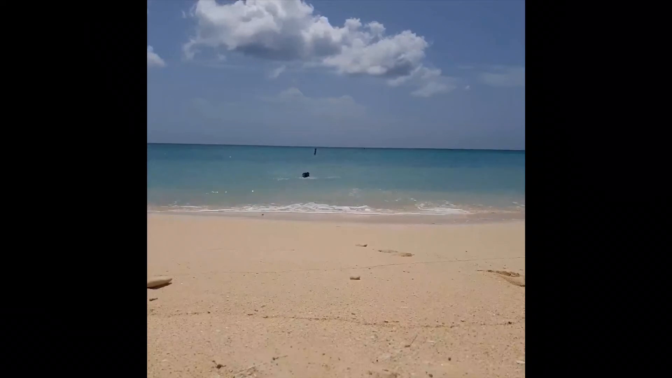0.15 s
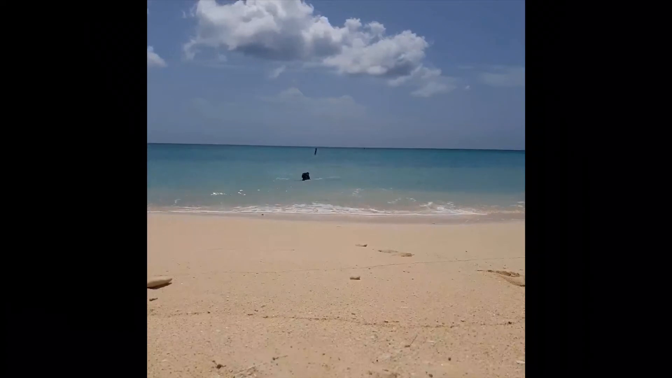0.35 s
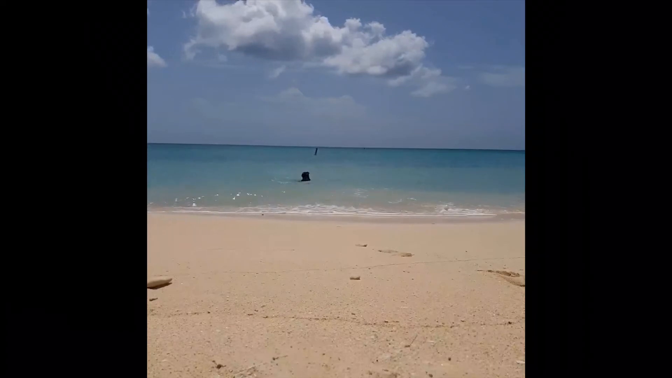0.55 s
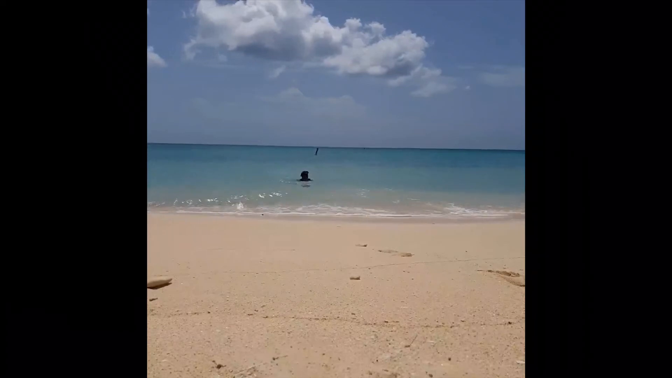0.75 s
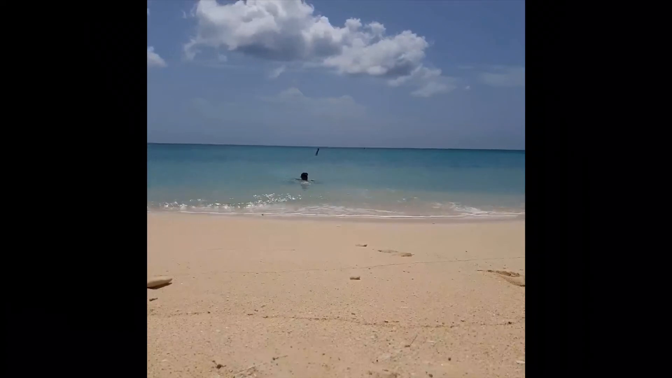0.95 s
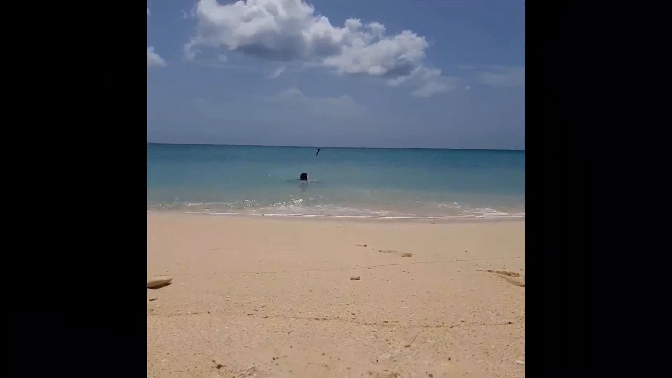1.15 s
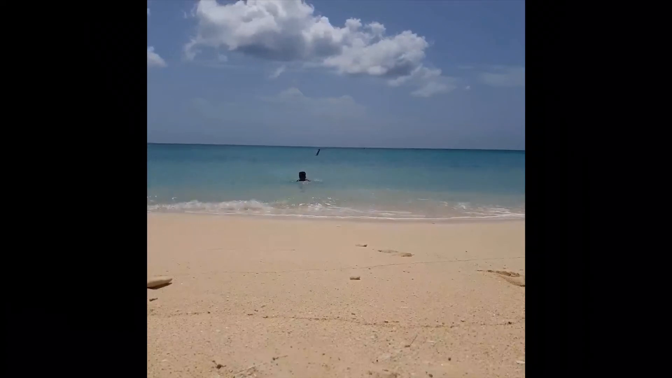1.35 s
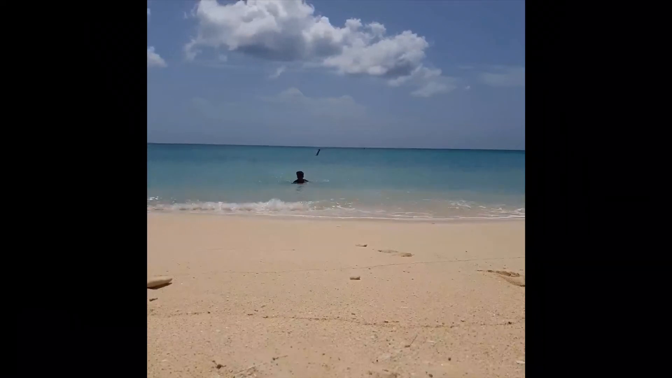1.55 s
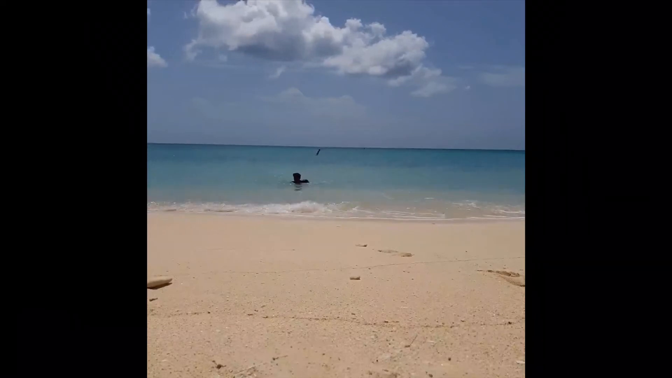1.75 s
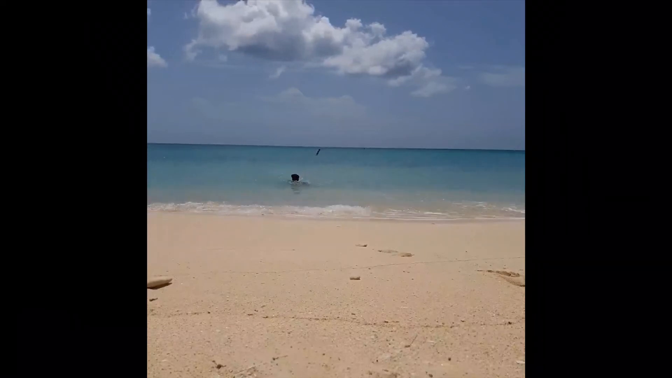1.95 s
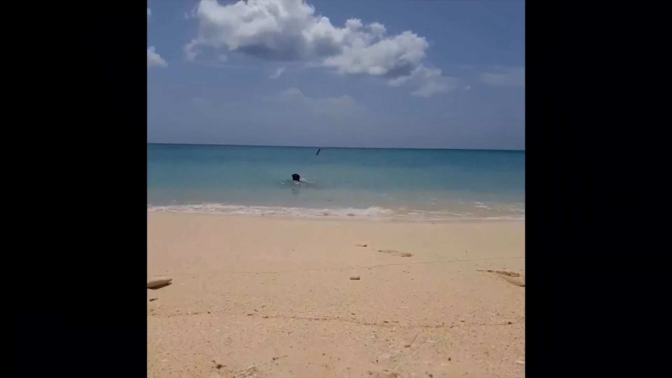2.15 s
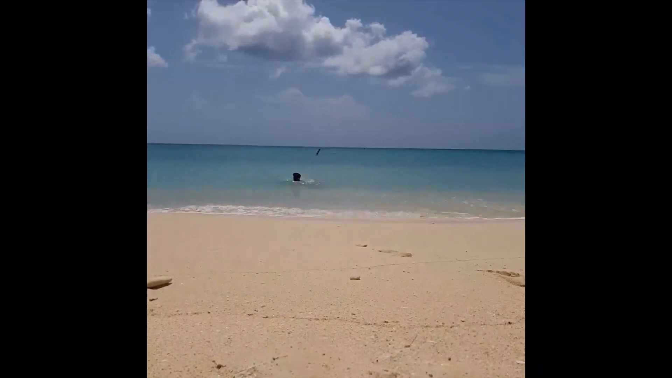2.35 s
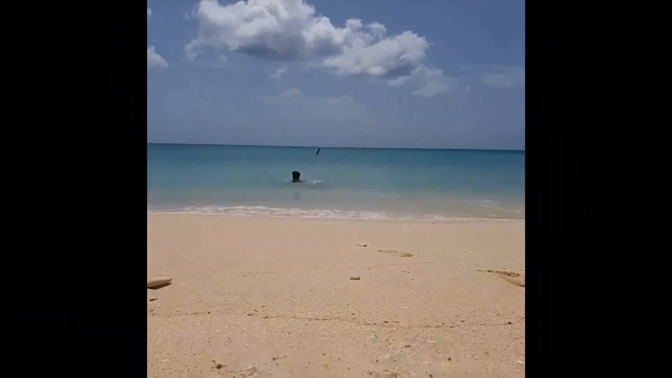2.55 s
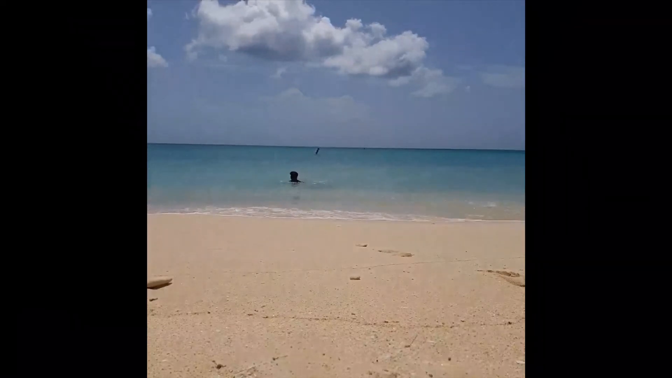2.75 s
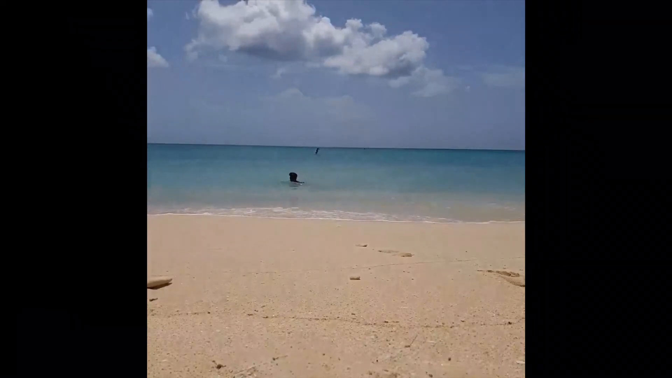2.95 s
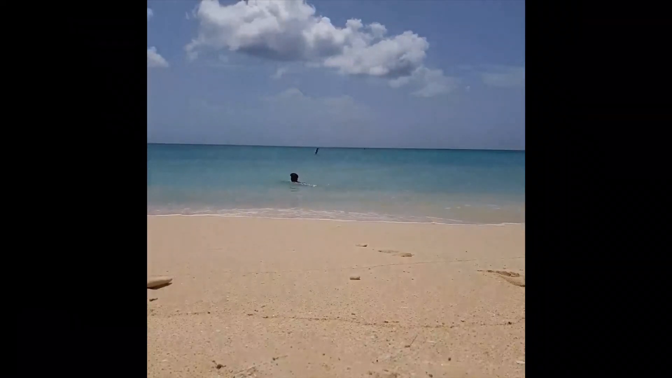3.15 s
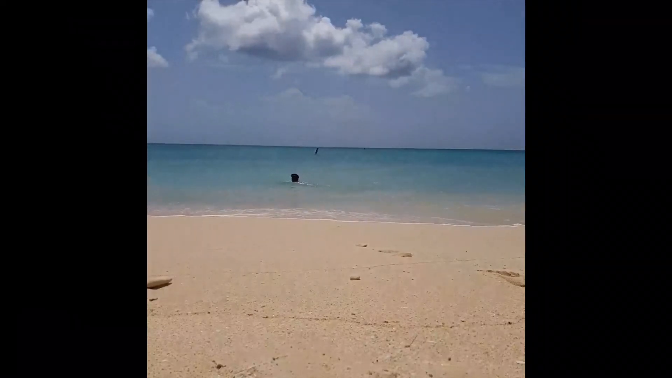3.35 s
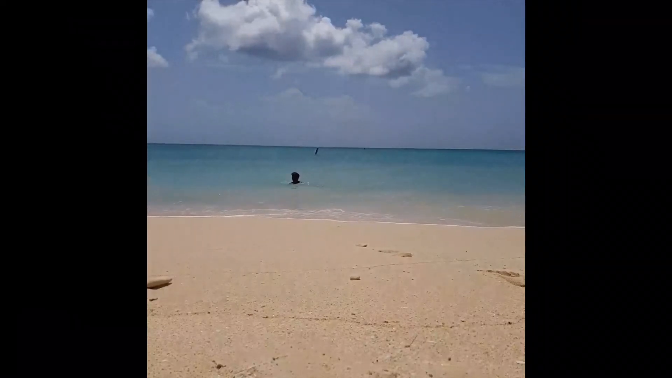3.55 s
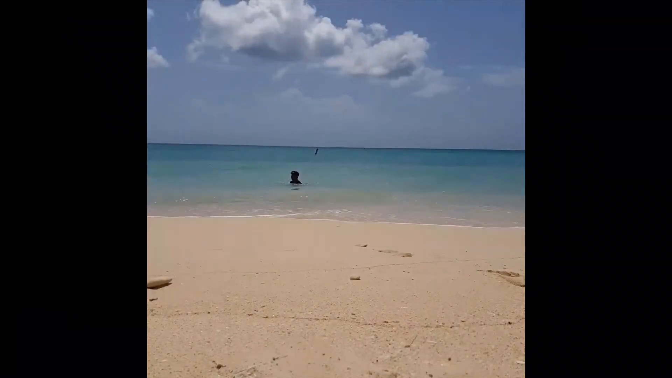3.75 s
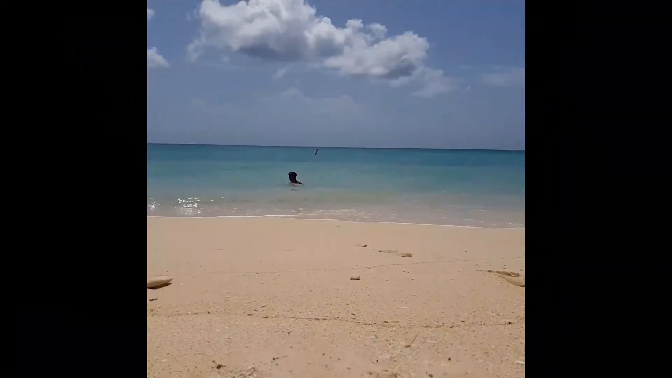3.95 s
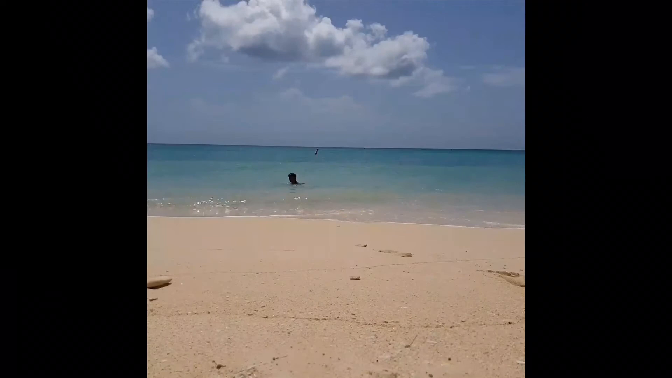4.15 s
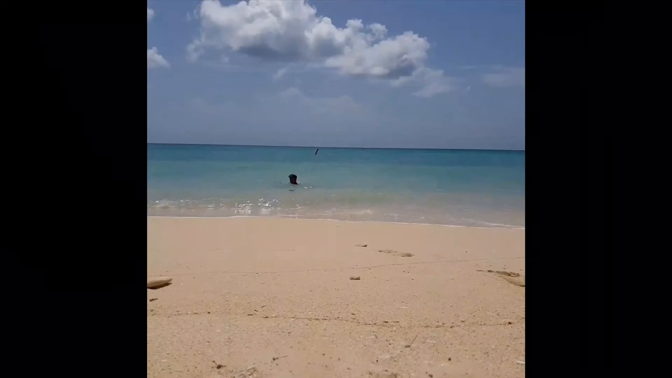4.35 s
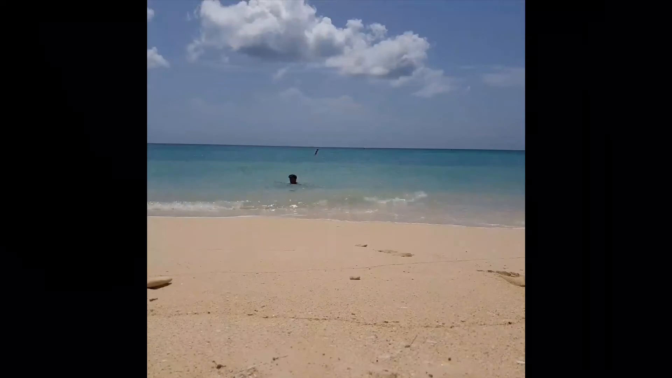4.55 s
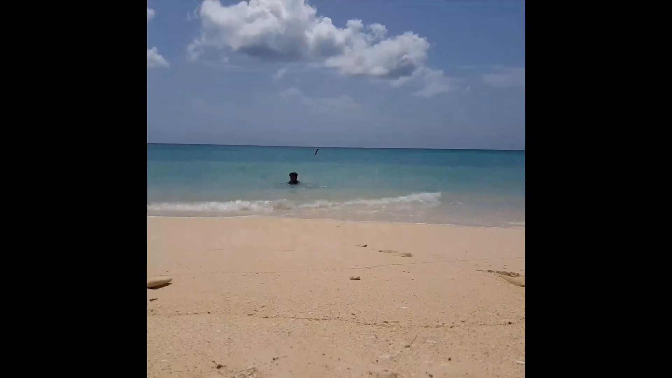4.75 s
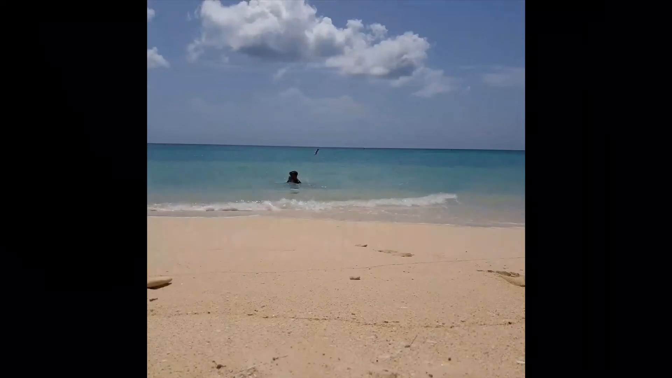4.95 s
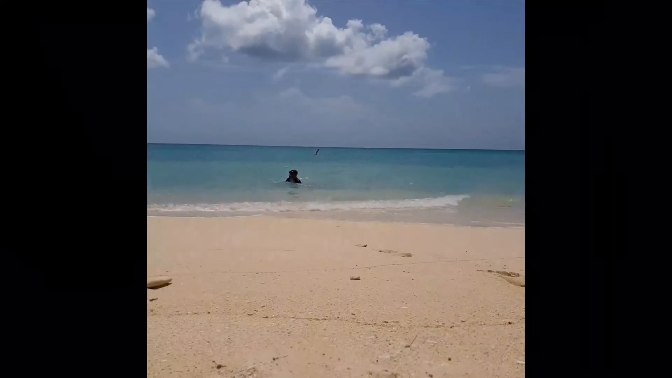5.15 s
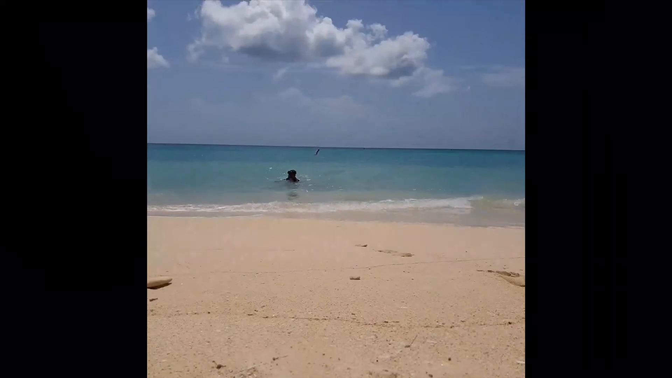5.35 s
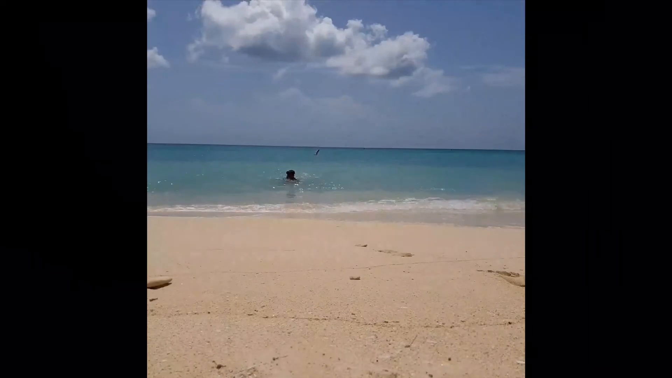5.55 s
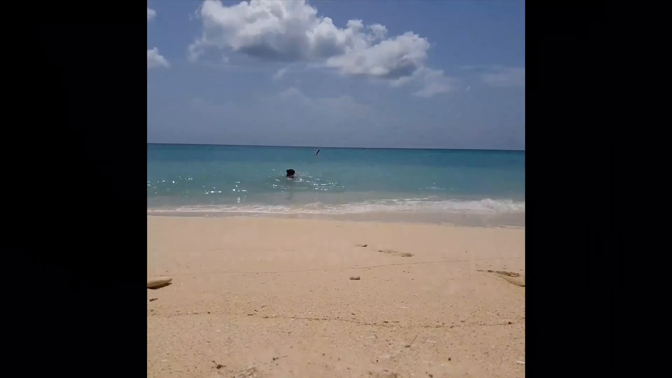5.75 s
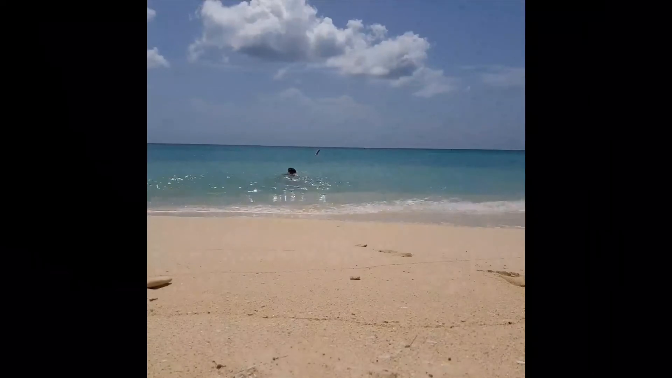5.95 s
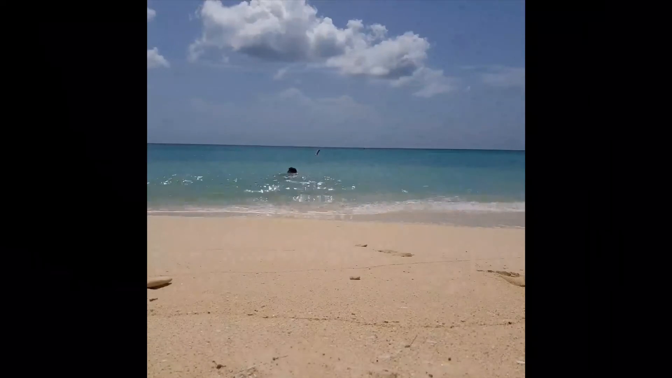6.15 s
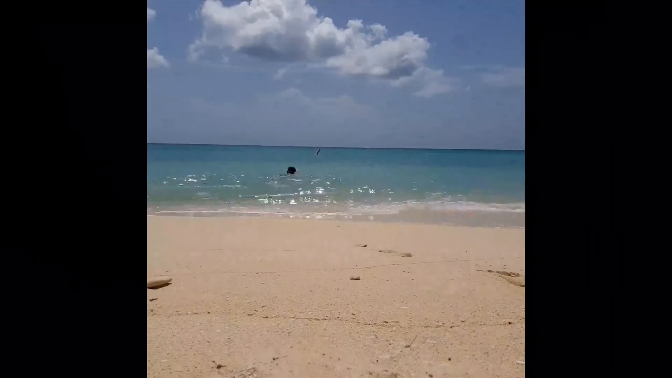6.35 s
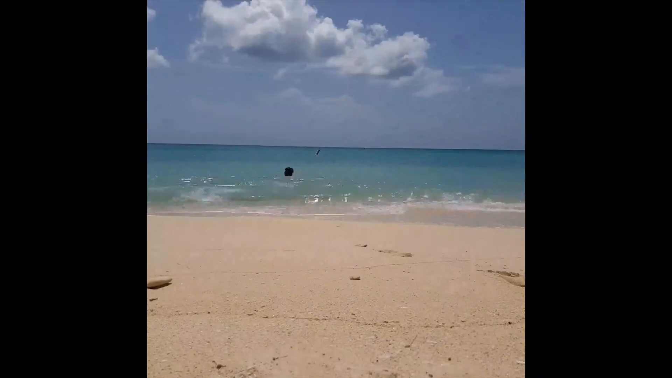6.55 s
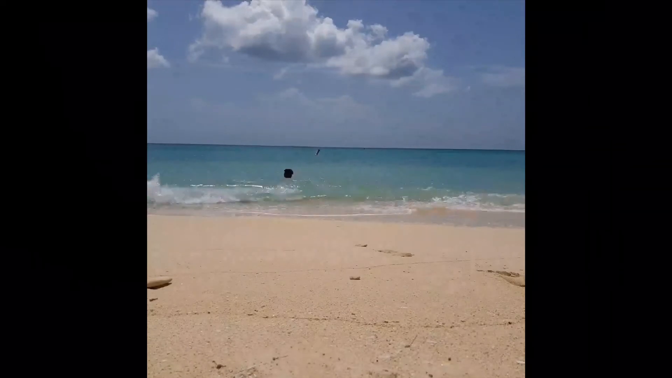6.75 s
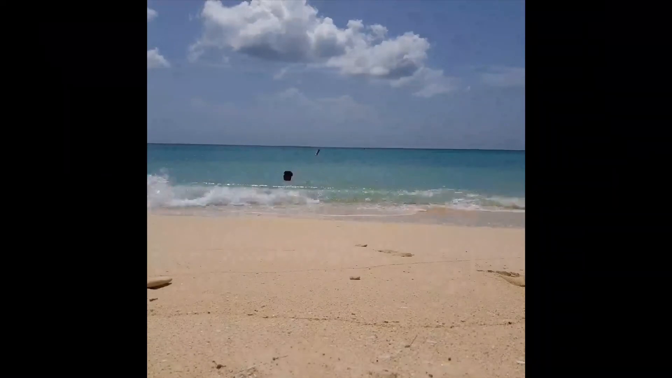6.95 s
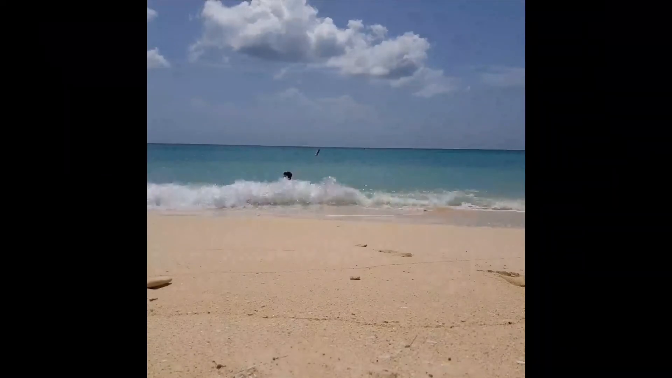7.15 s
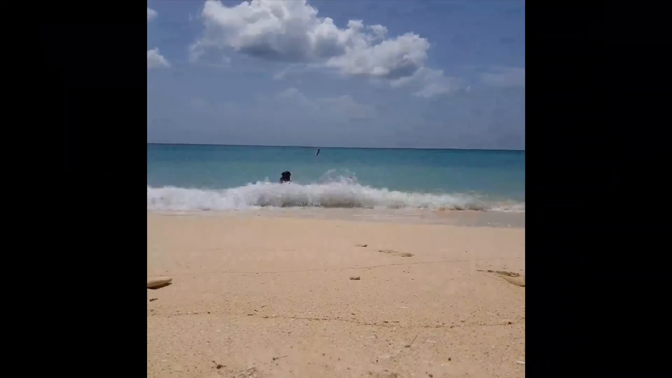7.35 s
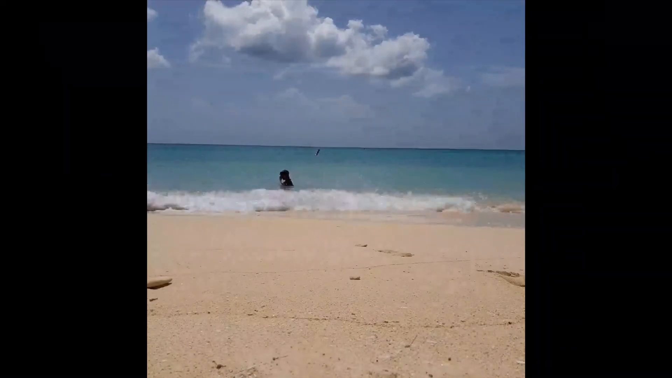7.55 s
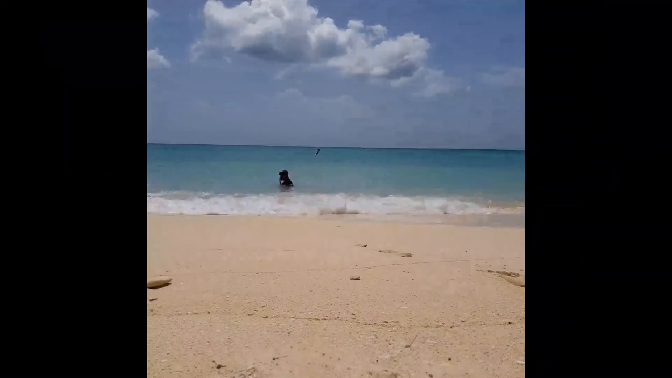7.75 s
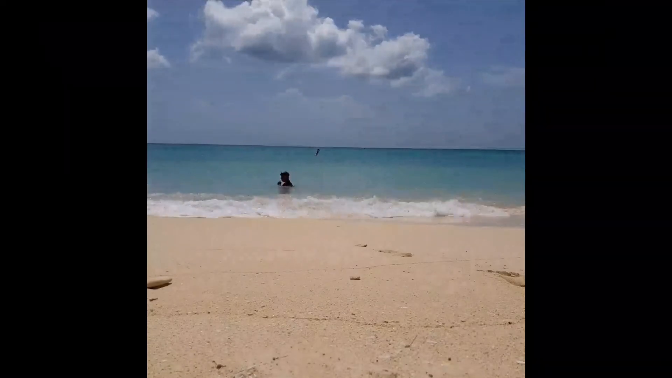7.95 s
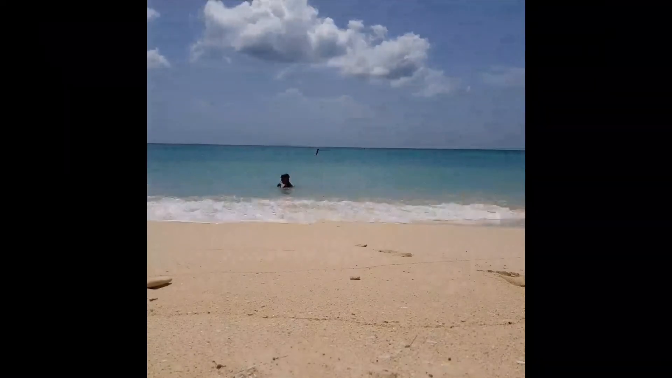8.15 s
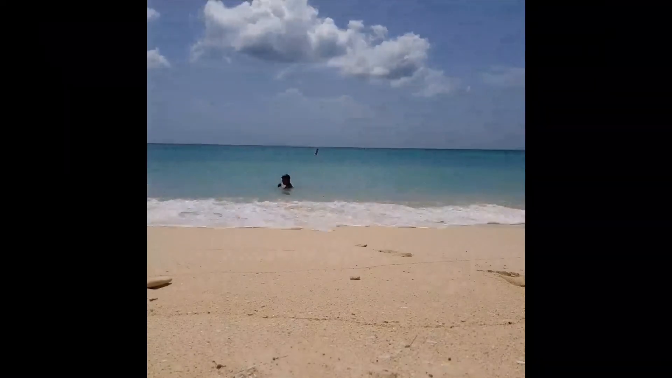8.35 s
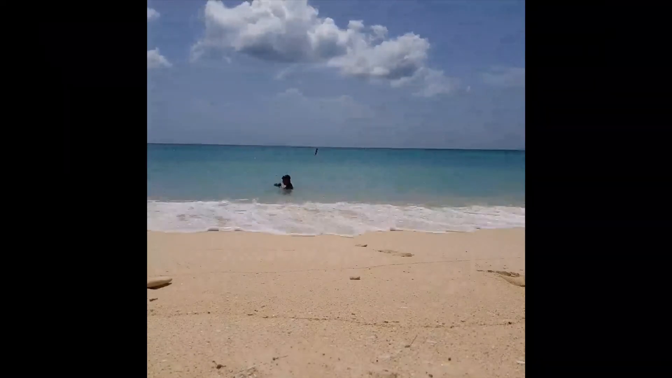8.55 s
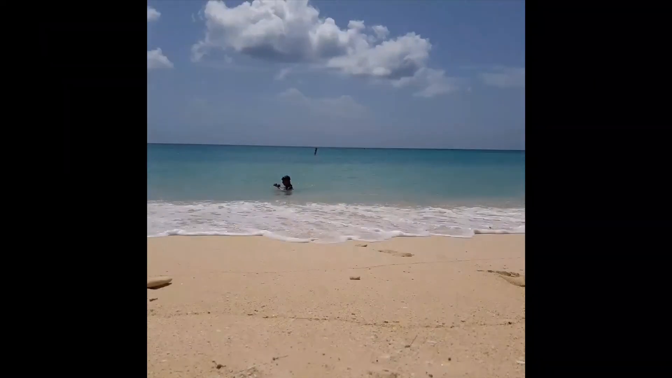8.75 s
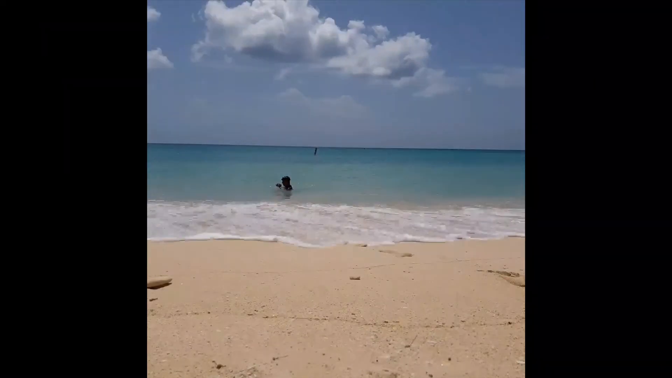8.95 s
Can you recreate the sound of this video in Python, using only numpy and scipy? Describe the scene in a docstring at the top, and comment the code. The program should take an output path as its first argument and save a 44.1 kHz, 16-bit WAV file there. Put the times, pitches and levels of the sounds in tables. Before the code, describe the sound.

Gentle surf splashes and foams over sand, swelling and ebbing, while wind puffs against the microphone and engines drone far away.

```python
"""Small waves spill on a sandy beach: noise and clouds of ringing bubbles make churn, splash, spray and foam.
The largest wave comes late, with a boom of buried air, and its foam fizzes on. Slaps and drops are short
bursts of noise; single large bubbles plop. Far engines, built from sine waves, drone over a noise rumble,
and one speeds up and fades. Puffs of wind thump on the left microphone port; the right one hears late and dull."""
import sys
import numpy as np
from scipy import signal
from scipy.fft import rfft, irfft, next_fast_len
from scipy.io import wavfile
from scipy.ndimage import uniform_filter1d, map_coordinates

SR = 44100
rng = np.random.default_rng(int(sys.argv[2]) if len(sys.argv) > 2 else 0)


def digitize_waveform(pressure):
    """Quantize a signal to 16-bit integers and store it at the path in sys.argv[1].

    Rows of a 2-D input are taken as channels; values are limited to [-1, 1].
    """
    field = np.atleast_2d(pressure).T
    bounded = np.clip(field, -1, 1)
    quanta = np.round(bounded * 32767).astype(np.int16)
    wavfile.write(sys.argv[1], SR, quanta)


N = 396900  # 9 seconds

# In the tables, rise, hold-style swell times (rise and fall in seconds per 10 dB) below 0.01 count as 0.01; #
# the rises of short bursts are used as written. Colours are relative: their sound is levelled afterwards.

# The far rumble of traffic and sea. Each row: frequency in Hz, colour in dB per Hz.
RUMBLE_COLOUR = [(20, -35), (40, -13.5), (65, -1), (90, -1), (130, -6.5), (200, -3), (300, -9), (600, -49),
                 (2000, -57)]
# An engine under load. Each row: frequency in Hz, colour in dB per Hz.
ROAR_COLOUR = [(60, -35), (150, 2.5), (220, -13), (340, -7.5), (550, -22.5), (1500, -36.5)]
# Engines roaring under load. Each row: start of the hold in seconds, level in dB, rise in seconds per 10 dB,
# hold in seconds, fall in seconds per 10 dB.
ENGINE_ROARS = [(2.65, -53, 9.5, 0.2, 0), (4.25, -47.5, 1.2, 0.26, 3), (8.55, -47, 0.2, 0.49, 4)]
# Engines drifting in and out of earshot. Each row: start of the hold in seconds, level in dB,
# rise in seconds per 10 dB, hold in seconds, fall in seconds per 10 dB, average firing rate in Hz.
ENGINE_DRONES = [(0, -49, .1, 0.26, -0.1, 95.1), (.2, -52.5, 1.5, 1.25, -0.5, 198.7),
                 (3.95, -54, 1.2, 3.3, 3, 73), (4.8, -54.5, 0.5, .95, 0.7, 93.5),
                 (6.3, -46, 0.1, .35, 3.5, 98.2)]
# One engine pulls away. Each row: time in seconds, average firing rate in Hz, level in dB.
ENGINE_PULLS_AWAY = [(7.8, 60, -72), (8.17, 63, -59), (8.3, 71, -49), (8.42, 81, -43.5), (8.6, 98, -43),
                     (8.78, 113, -41.5), (8.85, 117, -51), (9, 119, -66)]
# The tones of an exhaust. Each row: multiple of the firing rate, average relative level in dB.
EXHAUST_TONES = [(1, 3), (2, -15), (3, -13), (4, -24)]

# Gusts on the left port. Each row: start of the hold in seconds, level in dB before it wavers,
# rise in seconds per 10 dB, hold in seconds, fall in seconds per 10 dB.
WIND_GUSTS = [(.45, -38.5, -6, 0.33, -0.47), (1.2, -48.5, 1.5, 0.33, .1), (2.797, -46.5, 2, 0.1, .45),
              (5.9, -58, 0, .6, -0.8), (7.1, -46, 0.3, 0.34, -1.5)]
# Puffs on the left port. Each row: start in seconds, peak in dB before a cut of 0.5 dB, rise in seconds,
# sharp edge in dB relative to the uncut peak.
WIND_PUFFS = [(.322, -26, 0.0073, -4), (.425, -26.5, 0.015, -8.5), (.463, -24.5, 0.02, -11),
              (.53, -32, 0.0087, -16), (.578, -28, 0.0095, 1), (.65, -34, 0.0099, -8),
              (.715, -39, .012, -12), (.81, -31, .008, -11), (1.29, -39, 0.0079, -10),
              (2.618, -31, 0.0082, -6), (2.652, -35, .009, -12), (2.757, -25.5, .012, -13.5),
              (2.834, -34, .007, -12), (3.012, -42, 0.0061, -8), (3.44, -48, 0.012, -14),
              (5.85, -33, 0.007, -18), (5.91, -31, 0.0068, -14), (6.355, -32, 0.017, -8)]
# The large eddies of the wind. Each row: frequency in Hz, colour in dB per Hz.
BUFFET_COLOUR = [(20, -21), (50, -4), (90, 4.5), (150, -1), (250, -14), (400, -27), (1000, -77)]
# The smaller eddies of a sharp puff. Each row: frequency in Hz, colour in dB per Hz.
EDGE_COLOUR = [(60, -27), (150, 1.5), (260, 1), (400, -17), (1000, -60)]

# Drops of spray that tick sharply. Each row: start in seconds, peak in dB, rise in seconds.
SPRAY_DROPS = [(.786, -51, .0007), (1.258, -40, .0008), (2.182, -49.5, 0.00092), (2.370, -49.5, .0005),
               (2.697, -48, .0006), (2.985, -49, .0007), (4.091, -47.5, .0008), (4.458, -36, .0008),
               (7.142, -31, .0008)]
# The tick of a drop. Each row: frequency in Hz, colour in dB per Hz.
TICK_COLOUR = [(2000, -25), (5000, 2), (7300, 6), (8500, 0), (12500, -6)]
# Single large bubbles. Each row: start in seconds, starting pitch in Hz, level in dB,
# time to fall 60 dB in seconds.
BIG_BUBBLES = [(1.552, 520, -20, 0.02), (1.658, 370, -13.5, 0.019), (1.717, 344, -24, 0.025),
               (2.790, 1860, -39, 0.035), (2.882, 685, -35, 0.035), (3.033, 980, -35, .04),
               (3.763, 4500, -35, 0.011), (4.205, 1500, -38, .06), (4.288, 670, -32.5, 0.066),
               (4.796, 425, -20, 0.04), (6.262, 324, -14.5, 0.029)]
# Slaps of water at the shoreline. Each row: start in seconds, peak in dB before a cut of 4 dB, rise in seconds.
WATER_SLAPS = [(1.18, -37.5, .0085), (1.254, -36, 0.0077), (1.70, -38, 0.011), (1.80, -46, .015),
               (2.186, -38, 0.013), (2.857, -44.5, 0.011), (2.972, -42, .01), (3.0944, -45, 0.024),
               (3.77, -48, 0.012), (4.435, -41, 0.013), (6.248, -30, 0.013), (6.795, -23, 0.017),
               (7.32, -23.5, 0.027)]
# The sound of a slap. Each row: frequency in Hz, colour in dB per Hz.
SLAP_COLOUR = [(200, -13), (600, -4), (1500, 2.5), (3500, 2.0), (7000, -5), (8500, -15.0), (13000, -21)]
# The big wave collapses along its length. Each row: start of the hold in seconds, level in dB,
# rise in seconds per 10 dB, hold in seconds, fall in seconds per 10 dB.
WAVE_COLLAPSES = [(6.972, -34, 0.24, 0.088, 0.17), (7.25, -34.5, 0.15, 0.15, 0)]
# The pocket of air that it buries. Each row: frequency in Hz, colour in dB per Hz.
BOOM_COLOUR = [(60, -29), (110, -5.5), (160, 1.5), (240, -1.5), (320, -3), (480, -7), (900, -45)]

# Waves spilling on the sand. Each row: crest time in seconds, level in dB before the trapped air and the mix,
# rise in seconds per 10 dB, hold in seconds, fall in seconds per 10 dB, trapped air in dB.
SPILLING_WAVES = [(0.828, -45, 2, 0.35, 0.48, 7), (1.478, -40, 0.44, 0.13, 0.7, 0.6),
                  (2.855, -54, 0.14, 0.17, -0.1, 6), (3.79, -57.5, -1.4, .3, 10, -2),
                  (4.434, -37, 0.13, 0.26, 1.0, -4.5), (5.395, -42, 0.18, 1, -0.14, 2.5),
                  (6.762, -30, 1.31, 0.73, 0.2749, -0.76), (8.76, -52.5, 0.8, 0.28, .5, 2)]
# Foam runs up the sand. One row: start of the hold in seconds, level in dB before the mix,
# rise in seconds per 10 dB, hold in seconds, fall in seconds per 10 dB.
FOAM_SWASH = (8, -35, 2, 0.1, 0.5)
# The surf from big bubble clouds to the finest foam. Each row: frequency in Hz, colour in dB per Hz.
CHURN_COLOUR = [(30, -31), (60, -27), (105, -4), (170, -2), (250, 0), (380, 0), (520, -0.5), (650, -3),
                (850, -5.5), (1200, -15), (2500, -54)]
SPLASH_COLOUR = [(350, -54), (700, -8), (950, -2.5), (1120, -3), (1400, -1.5), (1700, -2.5), (1950, -2.5),
                 (2400, -9.5), (4500, -39)]
SPRAY_COLOUR = [(900, -34), (1900, -6), (2400, -1), (3000, 0), (3900, 0.5), (5000, -2), (6200, -6.5),
                (7300, -7.5), (7900, -16.5), (9500, -23), (13000, -43)]
FOAM_COLOUR = [(3000, -22), (6000, 7), (7400, 3.5), (8300, -2), (9500, -2), (11500, 2.5), (13000, 0)]

# The right port against the left. Each row: frequency in Hz, gain in dB, likeness from 0 to 1, lag in radians,
# all for a bearing of 0.
RIGHT_PORT = [(60, -.3, .99, .05), (200, -.6, .99, .24), (420, -1.2, .97, .58), (620, 1.1, .96, 1.03),
              (800, -1.8, .88, 1.58), (1250, -8, .72, 2.0), (1550, -5.8, .77, 2.0), (1740, -4, .75, 2.55),
              (1900, -4.8, .78, 2.95), (2050, -5.5, .76, 3.2), (2170, -5.6, .72, 3.55),
              (2400, -7, .69, 4.2), (3100, -7.6, .65, 6.2), (4000, -9.6, .54, 8.0), (5000, -13.3, .2, 9.47),
              (7000, -27, .02, 10), (12000, -28.5, .02, 10)]
# The surf's bearing shifts between far left and straight ahead. Each row: time in seconds,
# bearing (1 far left, 0 the usual place, below 0 straight ahead).
SURF_BEARING = [(0, -0.3), (.6, 0.98), (1, 0.85), (1.5, -0.11), (2.1, -.4), (3.1, 0.47), (3.55, 1.3),
                (4.05, 1.5), (4.45, -0.48), (5.4, -0.0027), (6, 0.45), (6.5, 0.28), (7.25, -0.56),
                (7.95, -0.27), (8.5, -0.21), (9, 0.6)]
# What one step of bearing changes. Each row: frequency in Hz, right port in dB, its lag in radians,
# both ports in dB.
BEARING_EFFECT = [(620, 0.5, -0.038, 0), (950, 1.2, -0.11, 0.3), (1300, 4, 0.076, -1),
                  (1600, -1, 0.31, -0.5), (2200, 0, 0, 0.5), (3200, -4.5, -0.93, 1.5),
                  (4300, -3, -1.4, 0.5), (6000, 1.5, 0, 0.3), (9000, 1, 0, -0.1)]
# A band near 2 kHz where left and right cancel when mixed; it opens and closes.
# Each row: time in seconds, half width in Hz before it wavers.
HOLLOW_WIDTH = [(.35, 15), (.85, 175), (1.25, 180), (1.5, 130), (2.1, 205), (2.55, 165), (2.75, 15),
                (3.3, 15), (3.55, 130), (4.05, 225), (4.25, 110), (4.8, 180), (5.6, 85), (6.1, 160),
                (6.9, 140), (7.35, 220), (7.95, 205), (8.2, 150), (9, 165)]

# The sea between waves, in dB before the mix.
CALM_CHURN_DB, CALM_SPLASH_DB, CALM_SPRAY_DB, CALM_FOAM_DB = -53.5, -51.5, -71, -61
# Share of a wave's trapped air: a plunging wave splashes more and fizzes less.
CHURN_AIR_SHARE, SPLASH_AIR_SHARE, FOAM_AIR_SHARE = 0.89, 0.46, -0.11
# Water falls back, spray rains down and foam keeps bursting after the crest.
SPLASH_LINGER_S, SPLASH_LINGER_DB = 0.12, -4.5
SPRAY_LINGER_S, SPRAY_LINGER_DB = 0.47, -10
FOAM_LINGER_S, FOAM_LINGER_DB = 2.1, -5
RUMBLE_DB, HISS_DB = -49, -77.0
# The hollow's usual centre, its shift per step of bearing, its random wander, and how much its width wavers.
HOLLOW_HZ, HOLLOW_SHIFT_HZ, HOLLOW_WANDER_HZ, HOLLOW_FLUTTER = 1960, -91, 36.2, 0.39
TOP_HZ = 13100


def amp(db):
    """Turn decibels into gain."""
    return 10 ** (np.asarray(db) / 20)


def unit(x):
    """Scale a sound to an average strength (rms) of 1."""
    return x / np.sqrt(np.mean(x ** 2) + 1e-20)


def along(points, hz):
    """Read each column of a frequency table on a log axis."""
    f, *columns = np.transpose(points)
    return [np.interp(np.log(hz + 1), np.log(f + 1), column) for column in columns]


def curves(rows):
    """Read each column of a time table at every sample."""
    seconds, *columns = np.transpose(rows)
    return [np.interp(np.arange(N) / SR, seconds, column) for column in columns]


def wobble(rate):
    """Draw a smooth random curve through so many random points a second."""
    knots = rng.standard_normal(int(N * rate / SR) + 4)
    return map_coordinates(knots, [np.arange(N) * rate / SR])


def filtered(x, response):
    """Weigh the frequencies of a sound by a response."""
    m = next_fast_len(N + SR // 4)
    return irfft(rfft(x, m) * response(np.fft.rfftfreq(m, 1 / SR)), m)[..., :N]


def coloured(x, colour):
    """Shape a sound by a colour table, at rms 1."""
    return unit(filtered(x, lambda hz: amp(along(colour, hz)[0])))


def noise():
    """Two independent white noises, one for each of a pair of sounds."""
    return rng.standard_normal((2, N))


def patchy(depth_db):
    """Two white noises that share patches of random gain in time and frequency."""
    z = signal.stft(noise(), nperseg=512)[2]
    patches = uniform_filter1d(rng.standard_normal(z.shape[1:]), size=7, axis=0)
    patches = uniform_filter1d(patches, size=9, axis=1)
    return unit(signal.istft(z * amp(depth_db * unit(patches)), nperseg=512)[1][:, :N])


def swell(s, db, rise, hold, fall):
    """An envelope that climbs to its level at time s, holds and falls; rise and fall are seconds per 10 dB."""
    t = np.arange(N) / SR
    before = np.maximum(s - t, 0)
    after = np.maximum(t - s - hold, 0)
    return amp(db - 10 * before / max(rise, .01) - 10 * after / max(fall, .01))


def together(envelopes):
    """Combine envelopes: unrelated sounds add in power."""
    return np.sqrt(sum(e ** 2 for e in envelopes))


def bursts(rows):
    """The envelope of short bursts that swell quickly and die away."""
    envelope, t = np.zeros(N + SR), np.arange(SR // 2) / SR
    for s, db, rise in rows:
        u = t / max(rise, 1e-4)
        envelope[round(s * SR):][:len(t)] += amp(db) * u * np.exp(1 - u)  # peaks at u = 1
    return envelope[:N]


def engine(hz, envelope):
    """Multiples of the firing rate form an exhaust note, wavering in the moving air."""
    phase = 2 * np.pi * np.cumsum(hz * (1 + .006 * wobble(10))) / SR
    note = sum(amp(level + 0.47 * wobble(5.8)) * np.sin(round(k) * phase) for k, level in EXHAUST_TONES)
    return envelope * unit(note)


def traffic():
    """A low rumble with engines that drone and roar under load; one pulls away."""
    road = amp(RUMBLE_DB) * coloured(noise(), RUMBLE_COLOUR)
    road += together(swell(*row) for row in ENGINE_ROARS) * coloured(noise(), ROAR_COLOUR)
    for *shape, hz in ENGINE_DRONES:
        road[0] += engine(hz, swell(*shape))
    hz, db = curves(ENGINE_PULLS_AWAY)
    road[0] += engine(hz, amp(db))
    return road


def wind():
    """Eddies thump on the left port and barely touch the right; the microphone drops their lowest bass."""
    gusts = together(swell(*row) for row in WIND_GUSTS) * amp(2.5 * wobble(16))
    puffs = amp(-.5) * bursts(row[:3] for row in WIND_PUFFS)
    edge = bursts((s, db + edge_db, rise) for s, db, rise, edge_db in WIND_PUFFS)
    eddies = together([gusts, puffs]) * coloured(noise(), BUFFET_COLOUR)
    eddies += edge * coloured(noise(), EDGE_COLOUR)
    left_and_right = eddies * amp([[0], [-20]])
    return filtered(left_and_right, lambda hz: hz ** 2 / np.hypot(hz ** 2, 45 ** 2))


def drops():
    """Flung drops tick on the water and the wet sand, as very short bursts of bright noise."""
    return bursts(SPRAY_DROPS) * coloured(noise(), TICK_COLOUR)


def plops():
    """Single large bubbles ring briefly and rise a little in pitch."""
    out, t = np.zeros(N + SR), np.arange(SR // 5) / SR
    for s, hz, db, t60 in BIG_BUBBLES:
        age = t / t60
        tone = np.sin(2 * np.pi * hz * t * (1 + 0.038 * age))
        soft_start = 1 - np.exp(-t * hz)
        out[round(s * SR):][:len(t)] += amp(db) * tone * amp(-60 * age) * soft_start
    return out[:N]


def slaps():
    """Bits of the crest fall flat on the water, as short bursts of patchy noise."""
    return amp(-4.0) * bursts(WATER_SLAPS) * coloured(patchy(3.2), SLAP_COLOUR)


def collapse():
    """The falling crest buries air that booms as a dense, even roar."""
    return together(swell(*row) for row in WAVE_COLLAPSES) * coloured(noise(), BOOM_COLOUR)


def bubbles(low_hz, high_hz, cycles, spread_db, count):
    """A cloud of bubbles: each rings for a few cycles and rises in pitch as it nears the surface."""
    when, pitch, strength = rng.random((count, 3)).T
    hz = low_hz * (high_hz / low_hz) ** pitch[:, None]
    n = np.arange(int(min(cycles * SR / low_hz, 2000)))
    age = n * hz / SR / cycles
    size = amp(-spread_db * np.log(strength + .01))[:, None] * np.sqrt(hz)
    rings = size * np.sin(2 * np.pi * cycles * age * (1 + 0.14 * age)) * amp(-40 * age)
    places = (when * N).astype(int)[:, None] + n
    return unit(np.bincount(places.ravel(), rings.ravel(), N)[:N])


def water(colour, grains, grain_db, patchy_db, flutter_db):
    """Single bubbles over the rush of countless smaller ones, fluttering as the water tumbles."""
    rush = patchy(patchy_db)
    rush[0] += amp(grain_db) * grains
    return coloured(rush, colour) * amp(flutter_db * wobble(22))


def surge(air_share):
    """The strength of all waves, each shifted by a share of the air that it traps."""
    return together(swell(s, db + air_share * air_db, rise, hold, fall)
                    for s, db, rise, hold, fall, air_db in SPILLING_WAVES)


def lingering(envelope, seconds, db):
    """An envelope with the slowly dying trail that it leaves behind."""
    keep = np.exp(-1 / (SR * seconds))
    trail = signal.lfilter([1 - keep], [1, -keep], envelope ** 2)
    return np.sqrt(envelope ** 2 + amp(db) ** 2 * trail)


def churn():
    """Trapped air booms in big bubble clouds while a crest spills."""
    strength = together([surge(CHURN_AIR_SHARE), amp(CALM_CHURN_DB)])
    cloud = bubbles(161.4, 766, cycles=5.4, spread_db=0.5, count=2400)
    return amp(0.43) * strength * water(CHURN_COLOUR, cloud, grain_db=-20.0, patchy_db=0.72, flutter_db=0.27)


def splash():
    """Splashing water trails after the crest as it falls back."""
    trail = lingering(surge(SPLASH_AIR_SHARE), SPLASH_LINGER_S, SPLASH_LINGER_DB)
    strength = together([trail, amp(CALM_SPLASH_DB)])
    cloud = bubbles(705, 2185, cycles=19.0, spread_db=1.0, count=2500)
    return amp(-3.0) * strength * water(SPLASH_COLOUR, cloud, grain_db=-18.0, patchy_db=1.6, flutter_db=0.05)


def spray():
    """Fine spray rains down a little longer, with many small bubbles."""
    trail = lingering(surge(0), SPRAY_LINGER_S, SPRAY_LINGER_DB)
    strength = together([trail, amp(CALM_SPRAY_DB)])
    cloud = bubbles(1900, 7570, cycles=12.0, spread_db=3.0, count=7000)
    return amp(-0.18) * strength * water(SPRAY_COLOUR, cloud, grain_db=-15.0, patchy_db=1.3, flutter_db=0.17)


def foam():
    """The finest bubbles keep bursting and fizz on up the sand."""
    trail = lingering(surge(FOAM_AIR_SHARE), FOAM_LINGER_S, FOAM_LINGER_DB)
    strength = together([trail, swell(*FOAM_SWASH), amp(CALM_FOAM_DB)])
    cloud = bubbles(6300, 13500, cycles=4, spread_db=2.0, count=9000)
    return amp(-11.5) * strength * water(FOAM_COLOUR, cloud, grain_db=-8.5, patchy_db=2.3, flutter_db=0.5)


def surf():
    """Waves spill as churn, splash, spray and foam, whose level flutters together."""
    return (churn() + splash() + spray() + foam()) * amp(0.33 * wobble(20))


def hollow(left, right, hz, s, bearing):
    """Remove what left and right share in a wandering band near 2 kHz, so that they cancel there when mixed."""
    width = np.interp(s, *np.transpose(HOLLOW_WIDTH))
    wander, flutter = (np.interp(s, np.arange(N) / SR, wobble(14)) for _ in range(2))
    width = width * np.exp(HOLLOW_FLUTTER * flutter)
    centre = HOLLOW_HZ + HOLLOW_SHIFT_HZ * bearing + HOLLOW_WANDER_HZ * wander
    shared = (left + right) / 2 * np.exp(-((hz - centre) / width) ** 8)
    return np.array([left, right]) - shared


def ports(field):
    """The left port hears the direct sound; the right hears it late and dull, mixed with diffuse sound."""
    hz, s, (direct, diffuse) = signal.stft(field, SR, nperseg=2048)
    hz = hz[:, None]
    bearing = np.interp(s, *np.transpose(SURF_BEARING))
    db, alike, lag = along(RIGHT_PORT, hz)
    shade_db, extra_lag, both_db = along(BEARING_EFFECT, hz)
    late = alike * np.exp(-1j * (lag + bearing * extra_lag)) * direct
    right = amp(db + bearing * shade_db) * (late + np.sqrt(1 - alike ** 2) * diffuse)
    pair = hollow(direct, right, hz, s, bearing) * amp(bearing * both_db)
    return signal.istft(pair, nperseg=2048)[1][:, :N]


def scene():
    """Sea and far engines through the two ports, with wind on top."""
    field = traffic() + drops() + slaps() + collapse() + surf()
    field[0] += plops()
    return ports(field) + wind()


def record(dry):
    """The microphone adds a faint hiss, and nothing above its band limit is kept."""
    hiss = amp(HISS_DB) * noise()
    return filtered(dry + hiss, lambda hz: hz < TOP_HZ)


dry = scene()
out = record(dry)
digitize_waveform(out)
```